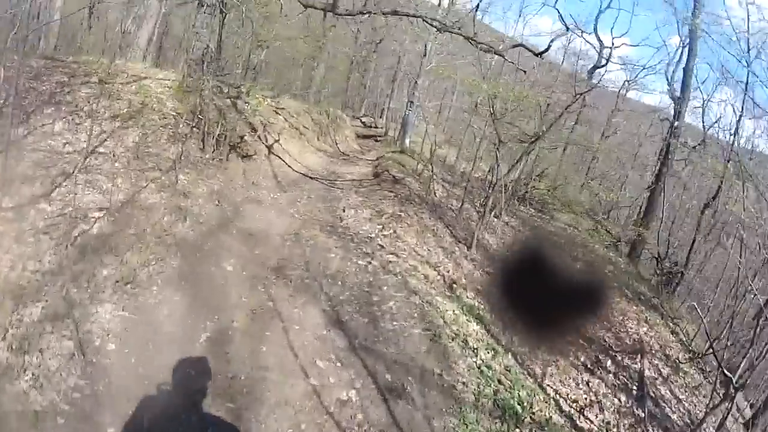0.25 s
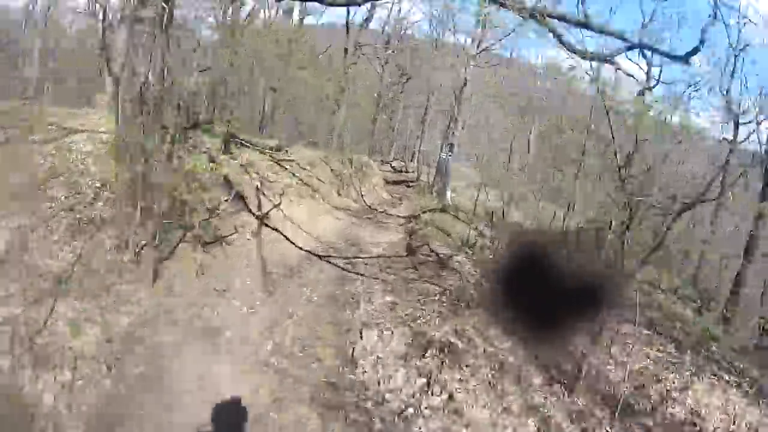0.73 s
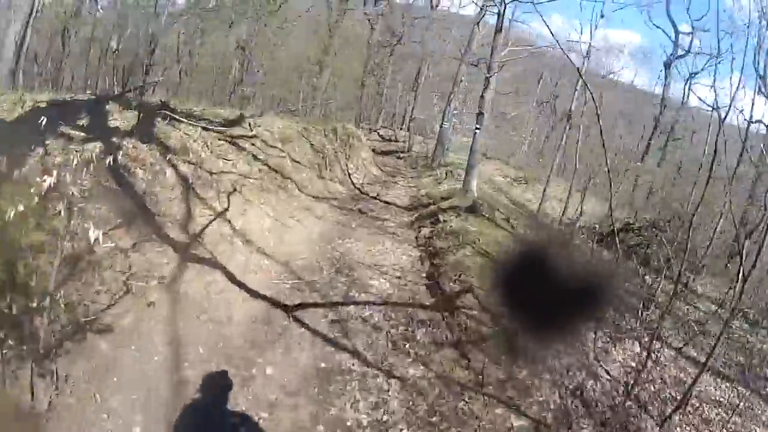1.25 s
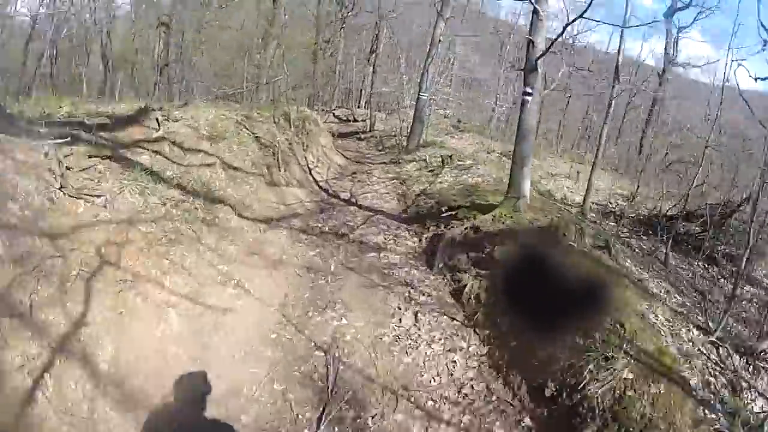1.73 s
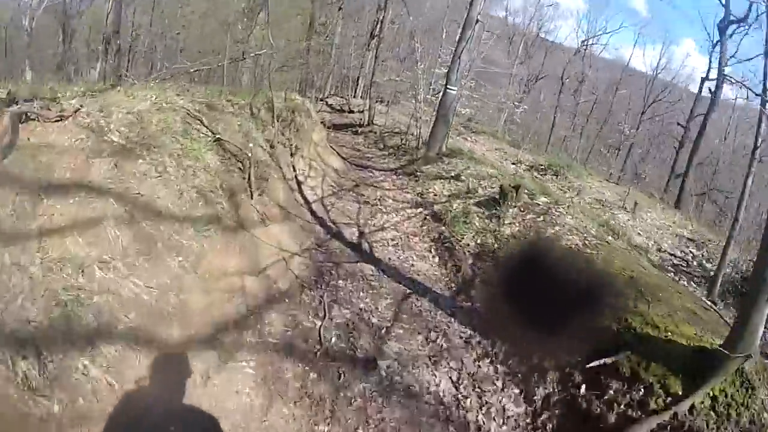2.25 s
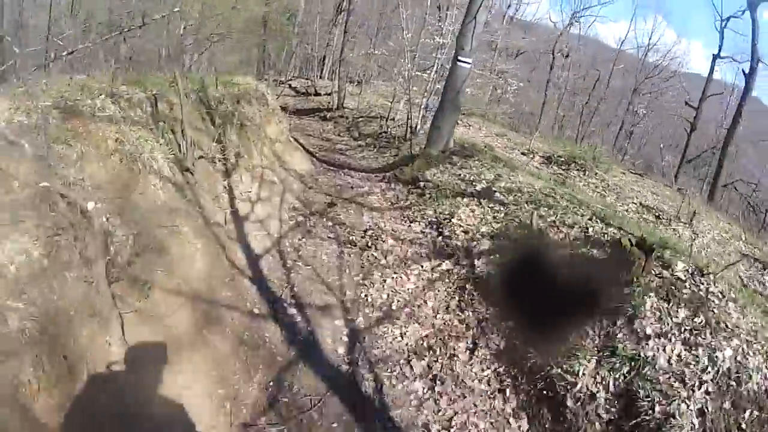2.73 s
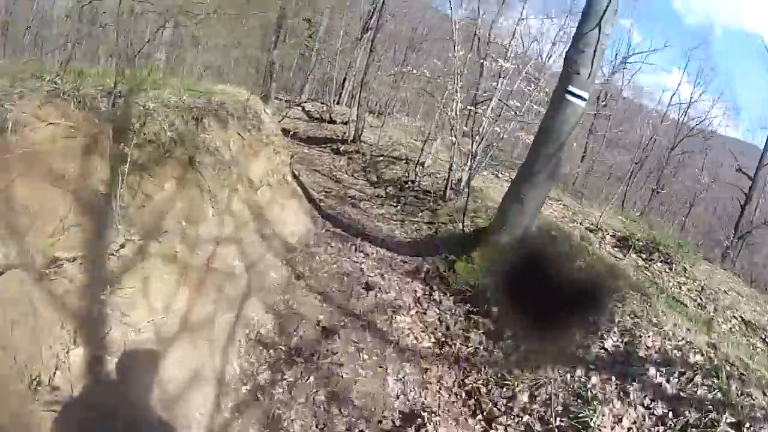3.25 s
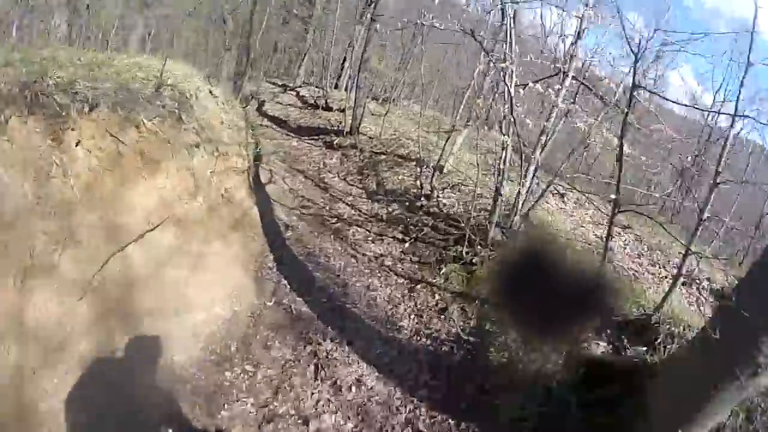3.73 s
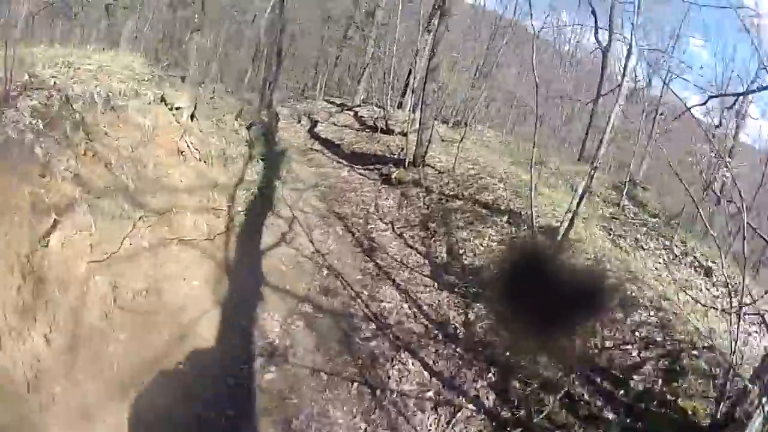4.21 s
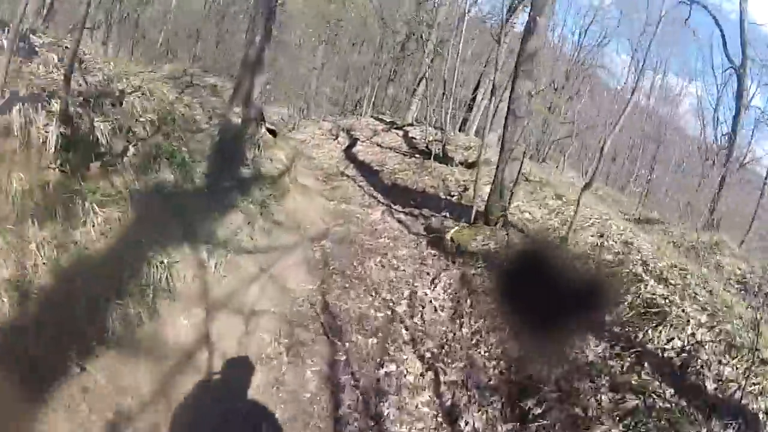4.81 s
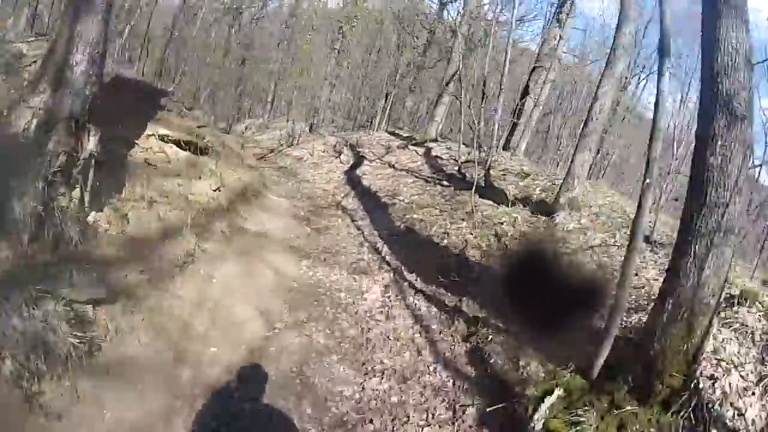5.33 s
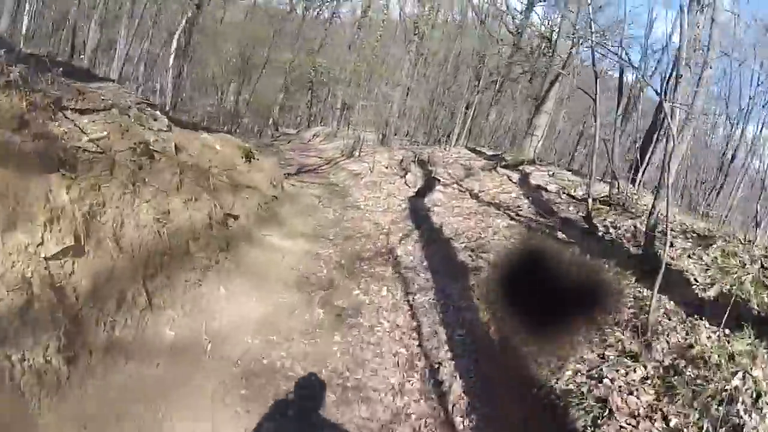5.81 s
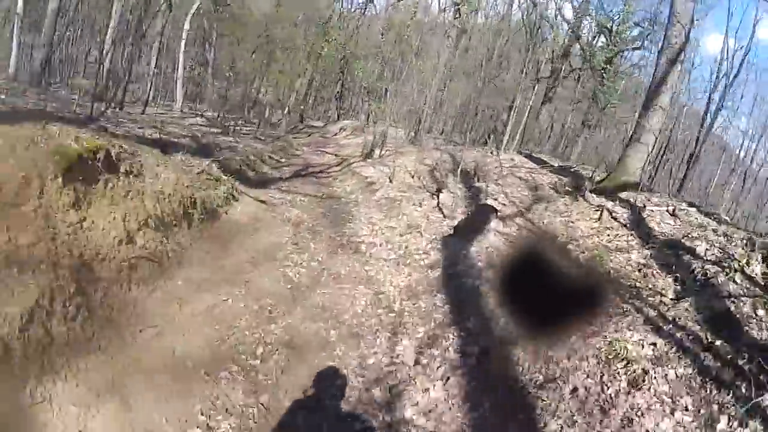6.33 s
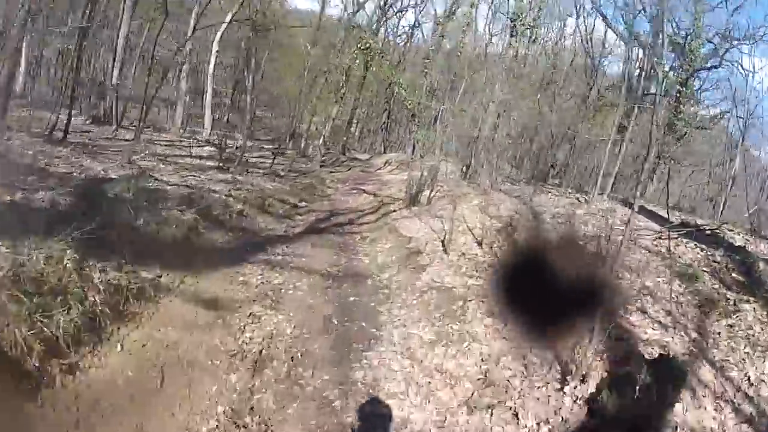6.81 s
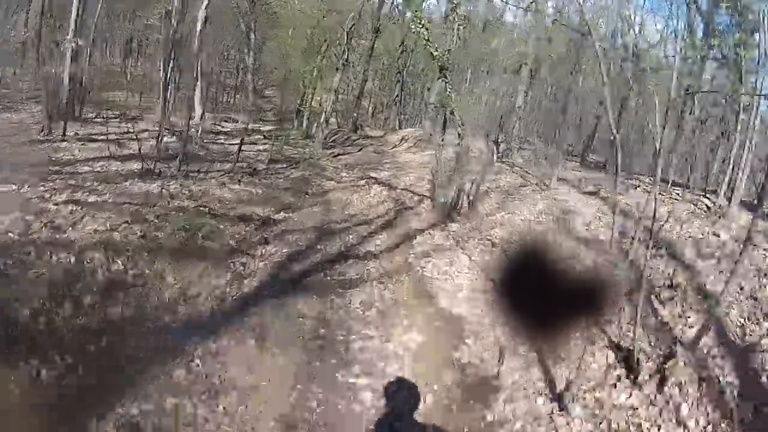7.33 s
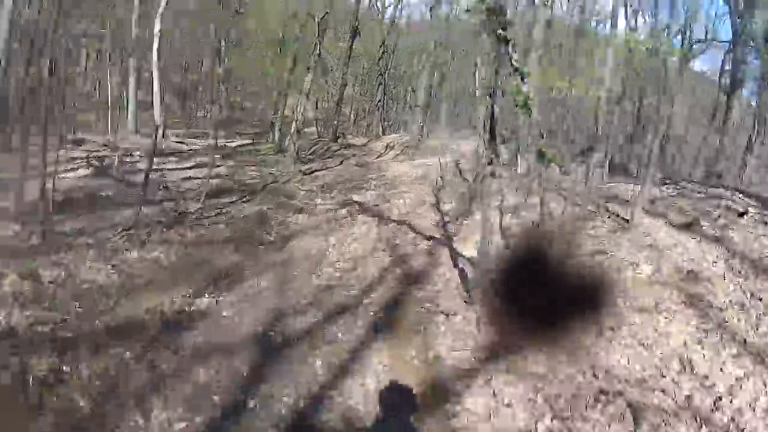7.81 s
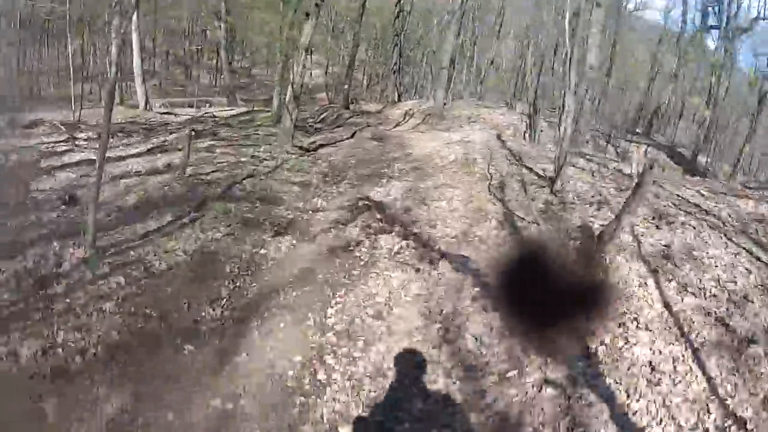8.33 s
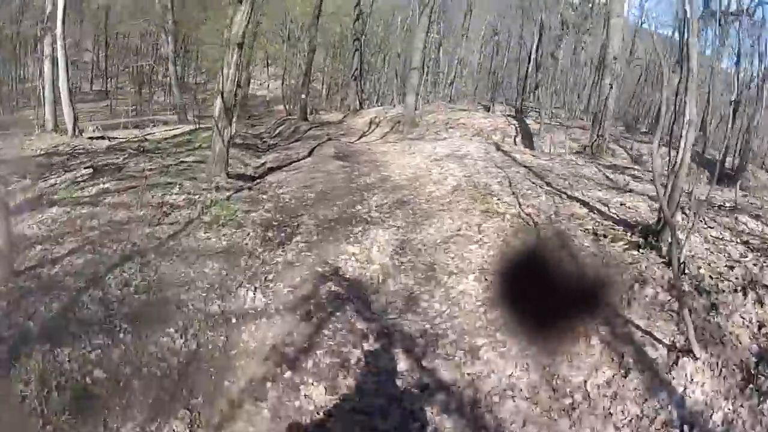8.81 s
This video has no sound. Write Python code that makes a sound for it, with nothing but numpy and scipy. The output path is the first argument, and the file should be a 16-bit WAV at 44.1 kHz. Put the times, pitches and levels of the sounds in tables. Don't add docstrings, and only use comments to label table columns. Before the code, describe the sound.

Heard from inside a plastic camera case on a cyclist's helmet: low wind buffeting, dull rumbling and faint tyre hiss on a dry woodland path, with leaf crackles and distant birds. After about three seconds, hard knocks, scrapes and low thuds from the loose mount dominate for four seconds, including a tiny squeak, then it settles back to quiet rolling.

```python
import sys
import numpy as np
from scipy import signal
from scipy.fft import rfft, irfft, next_fast_len
from scipy.io import wavfile
from scipy.ndimage import uniform_filter1d

SR = 44100
rng = np.random.default_rng(int(sys.argv[2]) if len(sys.argv) > 2 else 0)


def wav_out(sig):
    wavfile.write(sys.argv[1], SR, np.round(np.clip(np.atleast_2d(sig).T, -1, 1) * 32767).astype(np.int16))


def elevation(decibels):
    levels = np.asarray(decibels, float)
    return 10 ** (levels / 20)


N = 399546

# [start_s is the peak: peak_s, rise_over_breeze_db, half_length_s]
GUSTS = [(0.503, 7, 0.3), (.96, 6, 0.61), (1.417, 13.5, 0.24), (1.848, 10, 0.59), (2.2, 5.5, 0.41),
         (2.85, 2.5, 0.22), (3.298, 21, 0.069), (3.553, 8, 0.32), (3.943, 10, 0.73), (4.368, 23, 0.17),
         (4.6, 16.5, 0.18), (5.187, 15.5, 0.14), (5.662, 19.5, 0.17), (5.787, 15.5, 0.6),
         (6.302, 9.5, 0.86), (6.64, 2, .3), (7.162, 12.5, 0.29), (7.948, 7.5, 1), (8.86, 8, .4),
         (9.06, 11, 0.36)]
# [frequency_hz, density_db_per_hz]
WIND_COLOUR = [(9, -36), (16, -6), (30, -4.5), (41, -1), (54, -5), (68, -19), (100, -27), (150, -48)]
# [time_s, hiss_db, bumpiness_db]
GROUND = [(0.0, -58, -48), (0.28, -63, -51.5), (0.6, -59.5, -52), (0.96, -62, -48), (1.19, -57, -47.5),
          (1.5, -60, -50), (2.19, -57.5, -48.5), (2.85, -60.5, -51.5), (3.4, -55.5, -52.5),
          (3.76, -58.5, -43.5), (3.94, -63, -56.5), (4.52, -57, -42), (5.2, -61, -47), (6.0, -57.5, -47),
          (6.97, -57, -45.5), (7.3, -59, -50.5), (8.86, -60, -52.5), (9.06, -56.5, -53.5)]
# [frequency_hz, density_db_per_hz]
DRONE_COLOUR = [(60, -8), (110, 0.5), (200, -1), (320, -12), (375, -4), (450, -13), (650, -29)]
# [frequency_hz, density_db_per_hz]
HISS_COLOUR = [(450, -50), (600, -5), (1000, -8.5), (1160, -4), (1430, -12), (1820, -2), (2100, -12),
               (2470, -0.5), (2950, -14.5), (3300, -7.5), (3900, -8), (4050, -12.5), (5300, -11),
               (6000, -7.5)]
# [frequency_hz, level_db]
METAL_MODES = [(3116, 2.5), (3195, -4), (3391, 7), (3614, 3), (3668, 2.5), (3802, 4), (3966, -23),
               (4250, -6), (4545, -4), (4646, -1)]
# [start_s, level_db, length_s]
CHAIN_SLAPS = [
    (0.39, 6.5, 0.084),
    (2.185, -10, 0.084),
    (3.488, 3, 0.047),
    (4, 2.5, 0.097),
    (4.44, 1, 0.044),
    (6.291, 7, 0.04),
    (6.763, 1, 0.045),
    (6.842, 1, 0.17),
    (7.643, 2, 0.12),
    (8.55, -2, 0.08),
]
# [start_s, length_s, from_hz, to_hz, level_db]
BIRD_NOTES = [(0, 0.23, 3800, 3650, -64.5), (0.524, 0.34, 3740, 3830, -66), (1.003, 0.085, 3950, 3860, -62),
              (1.6, 0.049, 3680, 3680, -59.5), (1.737, .09, 3540, 3670, -63), (1.8, 0.09, 3660, 3520, -58),
              (1.875, 0.094, 3500, 3720, -58.5), (2.42, 0.063, 3720, 3560, -64),
              (2.487, .07, 3530, 3800, -61), (7.65, 0.07, 2400, 2520, -64), (7.69, 0.2, 2525, 2425, -60),
              (7.877, 0.11, 2760, 2620, -67), (.66, .06, 3680, 3800, -67), (.8, .06, 3830, 3900, -66),
              (0.953, .06, 3850, 3700, -67), (1.6, 0.056, 3840, 3960, -68), (2.659, 0.19, 4255, 4245, -69),
              (2.18, 0.11, 3830, 3800, -65), (7.95, .06, 3980, 3990, -69), (8.804, 0.23, 2450, 2440, -67)]
# [start_s, peak_db]
LEAF_CRACKS = [(0.2568, -46), (0.457, -46), (0.5127, -46.5), (1.1758, -38.5), (1.249, -42), (1.2614, -50),
               (1.321, -46), (1.345, -45), (1.681, -39.5), (1.7414, -45), (1.753, -47), (1.9487, -44.5),
               (2.199, -49), (3.285, -42.5), (3.5354, -43), (3.649, -42), (3.701, -47), (4.121, -43),
               (4.1767, -48), (4.339, -32), (4.346, -38), (4.354, -42), (4.333, -44), (5.635, -38),
               (5.657, -41.5), (6.4787, -39.5), (6.5966, -48.5), (6.8783, -44.5), (7.243, -49),
               (7.803, -50), (8.7054, -46.5)]
# [start_s, latch_db, shell_db, brow_db, lens_cover_db]
KNOCKS = [(0.44, -32, -35.5, -38, -31), (0.4549, -39, -45, -29, -46), (3.3542, -20, -27.5, -35, -17.5),
          (3.4135, -27.5, -35.5, -55, -52), (3.5339, -12.5, -20, -13.5, -23.5),
          (3.643, -20.5, -29.5, -34.5, -31), (3.7491, -12.5, -19, -18, -29.5), (3.8434, -22, -33, -29, -28),
          (3.8542, -19.5, -31, -29, -46), (4.12, -8.5, -20, -42, -23), (4.2566, -8, -21, -38, -21),
          (4.3146, -17.5, -28, -18.5, -31), (4.3287, -14.5, -33, -29, -21), (4.4903, -26, -29.5, -39, -24),
          (4.567, -17.5, -23, -26.5, -22.5), (4.6725, -23, -48, -30.5, -37), (4.8634, -15, -18, -41, -30.5),
          (5.1258, -21, -33, -27.5, -32.5), (5.698, -18, -42, -29.5, -27), (5.8374, -22, -34, -20.5, -34),
          (5.9035, -25.5, -30.5, -25, -29), (6.264, -19, -25.5, -24, -25.5), (6.379, -15, -19, -33, -27),
          (7.285, -11.5, -21, -31, -27.5)]
# [start_s, latch_db, shell_db, brow_db]
TAPS = [(0.2586, -44, -42, -37.5), (3.9316, -54, -44, -50), (2.816, -47, -74, -66), (3.552, -34, -35, -26),
        (3.605, -38, -42, -43), (3.7802, -33, -35.5, -46), (3.9036, -34, -35, -51),
        (4.1315, -20, -29, -33.5), (4.2665, -45, -27, -25.5), (4.4336, -27, -37, -31),
        (4.4503, -29, -40, -41), (4.733, -33, -42.5, -35), (4.9658, -36, -33, -35), (5.1735, -36, -44, -43),
        (5.243, -25.5, -37, -36.5), (5.3765, -36.5, -50, -32), (5.611, -33, -44, -31),
        (5.973, -35, -37, -42), (6.092, -27, -43, -34.5), (6.124, -53, -39, -37), (6.329, -22.5, -26, -51),
        (6.4948, -24.5, -31.5, -27.5), (6.5466, -28.5, -42, -32.5), (7.24, -50, -56, -46),
        (6.763, -33, -44, -60), (6.9729, -31, -33, -27), (7.0262, -21.5, -45, -21.5),
        (7.141, -38, -31.5, -42), (6.85, -42, -46, -57), (5.4571, -37, -44, -42), (4.560, -26, -42, -34),
        (3.877, -43, -37, -40), (6.619, -36, -28.5, -48), (7.080, -46, -32, -49), (3.273, -38.5, -57, -50),
        (4.579, -27, -38, -46), (6.59, -48, -42, -34)]
# [start_s, shell_hz, latch_hz]
SPOTS = [(0.259, 660, 1880), (0.441, 793, 1500), (0.4554, 706, 1790), (3.355, 1120, 1730),
         (3.4135, 1170, 1960), (3.534, 1154, 1760), (3.552, 990, 1880), (3.605, 1040, 1560),
         (3.643, 940, 1930), (3.749, 760, 1870), (3.78, 1080, 2170), (3.8434, 850, 1870),
         (3.8544, 1010, 1730), (3.9036, 1060, 1780), (4.121, 1174, 1750), (4.1315, 1070, 1750),
         (4.2564, 1120, 1750), (4.2666, 970, 1680), (4.315, 647, 1630), (4.329, 1300, 1970),
         (4.4335, 1040, 2420), (4.45, 1290, 1730), (4.491, 1280, 1880), (4.56, 1320, 1830),
         (4.567, 1240, 1810), (4.6725, 1000, 1830), (4.733, 736, 1560), (4.863, 838, 1850),
         (4.966, 594, 2080), (5.126, 940, 1824), (5.1735, 730, 1840), (5.243, 1150, 1700),
         (5.3765, 810, 1690), (5.611, 710, 1730), (5.698, 1080, 2010), (5.837, 705, 1765),
         (5.904, 980, 1685), (5.973, 720, 1850), (6.092, 600, 1810), (6.264, 1140, 1743),
         (6.329, 990, 1700), (6.379, 830, 1585), (6.495, 1100, 1790), (6.547, 710, 1700),
         (6.759, 730, 1920), (6.973, 1095, 2030), (7.026, 730, 1554), (7.141, 1010, 1880),
         (7.285, 895, 1840)]
# [frequency_hz, level_db, t60_s]
SHELL_MODES = [(720, 8.5, 0.037), (810, 2.5, 0.042), (958, 9.5, 0.019), (1123, 5.5, 0.026)]
# [frequency_hz, level_db, t60_s]
LATCH_MODES = [(1703, -3, 0.008), (1820, 3, 0.015), (1890, 4, 0.015), (2050, -8.5, 0.035),
               (2580, -11, 0.065)]
# [frequency_hz, level_db, t60_s]
RUBBED_LATCH_MODES = [(1560, -2.5, .012), (1760, 1, 0.015), (1930, 0, 0.014), (2114, -0.5, 0.017)]
# [frequency_hz, level_db, t60_s]
BROW_MODES = [(273, 2, 0.011), (364, 0, 0.048), (430.6, -4.5, 0.056), (560, -5, 0.016)]
# [frequency_hz, level_db, t60_s]
COVER_MODES = [(2750, 8, 0.0033), (3500, -1.5, 0.011), (3680, -7, 0.016)]
# [start_s, peak_db]
GRIT_TICKS = [
    (0.5128, -49),
    (8.3145, -40),
    (8.5965, -35),
    (8.408, -46),
    (8.706, -46),
    (9.045, -46),
]
# [frequency_hz, level_db, t60_s]
GRIT_MODES = [(2010, -9, 0.013), (2450, 6, 0.015), (3680, -16, 0.011)]
# [start_s, length_s, level_db, thud_over_it_db, clack_over_it_db]
SCRAPES = [(3.286, 0.38, -58.5, 6, 7.5), (3.46, 0.083, -60, 4, 6), (3.705, 0.037, -43.5, 10, 10.5),
           (3.738, 0.027, -40.5, 11, 8), (3.755, 0.051, -46, 15.5, -12), (3.86, 0.039, -38.5, 17.5, -3.5),
           (3.886, 0.046, -39, 12, -10), (4.125, 0.032, -53, 18, -4), (4.26, 0.04, -47, -1, -1),
           (4.227, 0.045, -61, 0, 2), (4.394, 0.089, -47, 12, -1), (4.446, 0.056, -52, 7, 6),
           (4.532, 0.044, -50, 1, -2), (4.566, 0.13, -50, 5, -2), (4.824, 0.078, -46, 11, -3),
           (5.032, 0.14, -51, 5, -2.5), (5.255, 0.095, -47, 7, -19), (5.383, 0.21, -58.5, 7, -7),
           (5.592, 0.062, -45.5, 4, -8), (5.7, 0.036, -44, 6, -12), (5.816, 0.11, -47, 7, 0),
           (5.929, 0.086, -55.5, 13, 0), (6.108, 0.059, -45.5, 6, -11), (6.246, 0.12, -64, 16, -0.5),
           (6.5, 0.038, -43, -3, -3), (6.555, .03, -49, 6, -9), (6.566, 0.066, -40.5, 0, -15),
           (6.601, 0.089, -36.5, 2.5, -13.5), (6.678, 0.053, -45.5, 2, -9), (6.746, 0.051, -45, 4, 7.5),
           (6.773, 0.053, -39.5, 7, 1), (6.813, 0.03, -48, 12, -16), (6.845, 0.042, -46, -3, -6),
           (6.929, 0.062, -42, 0, -3.5), (6.966, 0.055, -36, 5, -12), (7.008, 0.036, -39.5, 1, -4),
           (7.035, 0.049, -42, 4.5, -14), (7.067, 0.047, -37.5, 4, -15), (7.112, 0.056, -47, 2, -12)]
# [start_s, level_db, pitch_hz]
SWINGS = [(3.273, -33, 129), (3.5348, -10.5, 167.4), (3.5515, -19, 170), (3.605, -30, 148),
          (3.7502, -31, 178), (3.8556, -21, 164), (3.9036, -24, 165), (3.879, -28, 175), (4.664, -36, 183),
          (4.121, -12, 169.4), (4.1313, -16, 164), (4.2569, -12.5, 172), (4.2656, -21, 141),
          (4.3151, -23.5, 159), (4.3294, -26, 149), (4.4506, -31, 160), (4.579, -26.5, 163),
          (4.6742, -25.5, 189), (4.9665, -26, 156), (5.1264, -25.5, 178), (5.244, -32.5, 188),
          (5.6117, -36, 136), (5.699, -19, 217), (5.8379, -23, 167.4), (5.9045, -22.5, 170),
          (5.974, -32.5, 151), (6.2652, -21, 172), (6.328, -25.5, 183), (5.622, -25.5, 72.5),
          (6.9735, -35, 169), (7.1408, -31, 163), (7.285, -29.5, 168), (5.107, -33.5, 164),
          (5.173, -35, 170), (3.866, -26, 170), (3.778, -27.5, 165), (6.66, -35, 166), (7.052, -34, 170),
          (6.815, -37, 185), (6.826, -37, 181), (7.163, -33, 121), (6.79, -34.5, 200)]
# [start_s, peak_db]
EDGE_SNAPS = [(3.3557, -48), (3.5104, -46), (3.5363, -40), (3.7812, -47), (3.8456, -43), (4.122, -37),
              (4.1624, -47), (4.2362, -48), (4.316, -46), (4.5607, -49), (4.8633, -50), (5.599, -49),
              (6.3783, -50), (6.9021, -48), (7.2848, -50)]
# [start_s, length_s, from_hz, to_hz, level_db, octave_over_it_db]
SQUEALS = [
    (6.762, .03, 1000, 1040, -36, 4.5),
    (6.792, 0.025, 1100, 1075, -38, -3),
    (3.375, .04, 1100, 1050, -60, 4),
    (6.955, .03, 1050, 1080, -50, 3),
]
# [frequency_hz, density_db_per_hz]
TRACKS_APART = [(40, 8), (250, -0.5), (650, -5), (1200, -13), (3000, -12.5), (5300, -11)]

SCRAPE_RISE, SCRAPE_FALL = 0.22, 0.32


def level(x):
    return x / np.sqrt(np.mean(x ** 2))


def curves(table):
    s, *columns = np.transpose(table)
    return [np.interp(np.arange(N) / SR, s, c) for c in columns]


def walk(rate_hz):
    hold = int(SR / rate_hz)
    steps = np.repeat(rng.standard_normal(N // hold + 1), hold)
    return 1.68 * uniform_filter1d(uniform_filter1d(steps, hold), hold)[:N]


def coloured(spectrum, grain_db, own_db, rate_hz, count):
    hz, db = np.transpose(spectrum)
    size = next_fast_len(N)
    log_hz = np.log(np.fft.rfftfreq(size, 1 / SR) + 1)
    grains = rng.standard_normal(N) * elevation(grain_db * walk(150))
    whole = rfft(grains, size) * elevation(np.interp(log_hz, np.log(hz), db, -120, -120))
    centres = np.linspace(np.log(hz[0]), np.log(hz[-1]), count)
    out = np.zeros(N)
    for centre in centres:
        share = np.clip(1 - np.abs(log_hz - centre) / (centres[1] - centres[0]), 0, 1)
        out += irfft(whole * share, size)[:N] * elevation(own_db * walk(rate_hz))
    return level(out)


def ring(x, hz, t60):
    turn, keep = 2 * np.pi * hz / SR, np.exp(-np.log(1000) / (t60 * SR))
    return signal.lfilter([0, keep * np.sin(turn)], [1, -2 * keep * np.cos(turn), keep ** 2], x)


def strikes(at_s, size):
    at = np.clip((at_s * SR).astype(int), 0, N - 1)
    return np.bincount(at.ravel(), size.ravel(), N)


def swell(start, length, rise, fall):
    at = np.arange(int(max(start, 0) * SR), int((start + length) * SR))
    gone = (at / SR - start) / length
    return at, np.clip(np.minimum(gone / rise, (1 - gone) / fall), 0, 1), gone


def slips(rate_hz, spread_db):
    contacts = (rng.random(N) < rate_hz / SR) * rng.standard_normal(N)
    return level(contacts * elevation(spread_db * rng.standard_exponential(N)))


def gusts():
    t = np.arange(N) / SR
    return np.max([db * np.clip(1 - np.abs(t - s) / half, 0, 1) for s, db, half in GUSTS], axis=0)


def wind(gust_db):
    return elevation(-47 + gust_db) * coloured(WIND_COLOUR, grain_db=0.5, own_db=1.36, rate_hz=4.4, count=3)


def drone(bump_db, gust_db):
    loudness = elevation(bump_db + 0.1 * gust_db + 0.2)
    return loudness * coloured(DRONE_COLOUR, grain_db=1.0, own_db=0.0, rate_hz=14, count=5)


def tyre_hiss(hiss_db):
    return elevation(hiss_db + 3.5) * coloured(HISS_COLOUR, grain_db=1.0, own_db=1.4, rate_hz=20, count=10)


def metal():
    t = np.arange(N) / SR
    slap = sum(elevation(db) * (t > s) * (t < s + length) for s, db, length in CHAIN_SLAPS)
    sing = np.zeros(N)
    for hz, db in METAL_MODES:
        push = rng.standard_normal(N) * (elevation(0.78 * walk(5.4)) + slap)
        sing += elevation(db) * ring(push, hz, 0.23)
    jingle = slap * ring(slips(1400, 1.6), 3690.0, 0.013)
    return elevation(-104.0) * sing + elevation(-75.0) * jingle


def birds():
    out, waver, flutter = np.zeros(N), walk(45), elevation(1.5 * walk(70))
    for s, length, from_hz, to_hz, db in BIRD_NOTES:
        at, fade, gone = swell(s, length, rise=0.17, fall=0.17)
        glide = from_hz + (to_hz - from_hz) * (1 - np.cos(np.pi * gone)) / 2
        turn = 2 * np.pi * np.cumsum(glide * (1 + 0.0025 * waver[at])) / SR
        out[at] += np.sqrt(2) * elevation(db) * fade * flutter[at] * np.sin(turn + 0.19 * np.sin(turn / 12))
    t = np.arange(8000) / SR
    echoes = rng.standard_normal(len(t)) * np.exp(-np.log(1000) * t / 0.23)
    echoes /= np.linalg.norm(echoes)
    return elevation(-1.0) * out + elevation(-11.0) * signal.fftconvolve(out, echoes)[:N]


def leaves():
    s, db = np.transpose(LEAF_CRACKS)
    grains = rng.standard_normal((len(s), 24, 2))
    at_s = s[:, None] + 0.0049 * np.abs(grains[..., 0])
    cracks = strikes(at_s, elevation(db - 3.5)[:, None] * grains[..., 1])
    return ring(cracks, 4830.0, 0.0036) + elevation(-5.5) * ring(cracks, 3760.0, 0.0019)


def struck(modes, at_s, db, chatter, scatter_db, lead_hz=None, lead_db=0, lead_s=.001, snap_db=-60,
           rubbed=None):
    t = np.arange(2000) / SR
    rub = uniform_filter1d(slips(3500, 1.3), size=8)
    rubbing = np.zeros(N)
    for k, (hz, gain_db, t60) in enumerate(rubbed or modes):
        rubbing += (-1) ** k * elevation(gain_db) * ring(rub, hz, 0.47 * t60)
    out = level(rubbing) * chatter
    for s, peak_db in zip(at_s, db):
        chance = rng.standard_normal((len(modes) + 1, 2))
        late = np.maximum(t - .007 - 0.00063 * chance[-1, 0], 0)
        bounce = elevation(-19.5 + 3.7 * chance[-1, 1]) * late / 0.0023 * np.exp(-late / 0.0023)
        flurry = (t / 0.0015) ** 2 * np.exp(-t / 0.0011) + bounce
        push = uniform_filter1d(rng.standard_normal(len(t)), size=8) * flurry
        y = np.zeros(len(t))
        for (hz, gain_db, t60), (louder, sharper) in zip(modes, chance):
            y += elevation(gain_db + scatter_db * louder) * ring(push, hz * (1 + 0.03 * sharper), t60)
        y = y / np.abs(y).max() + elevation(snap_db) * push / np.abs(push).max()
        if lead_hz is not None:
            hz = np.interp(s, np.array(SPOTS)[:, 0], lead_hz)
            clarity = elevation(lead_db + 0.18 * (peak_db + 18.0))
            y = y + clarity * (t / lead_s) ** 2 * np.exp(-t / lead_s) * np.sin(2 * np.pi * hz * t)
        spot = out[int(s * SR):][:len(t)]
        spot += (elevation(peak_db) * y)[:len(spot)]
    return out


def loose_mount(shake, high):
    taps = [(*tap, tap[1] - 26) for tap in TAPS]
    s, latch_db, shell_db, brow_db, cover_db = np.transpose([*KNOCKS, *taps])
    _, shell_hz, latch_hz = np.transpose(SPOTS)
    shell = struck(SHELL_MODES, s, shell_db + 0.5, shake, scatter_db=3.0,
                   lead_hz=shell_hz, lead_db=6.0, lead_s=0.0015)
    latch = struck(LATCH_MODES, s, latch_db - 3.0, high, scatter_db=5.5, lead_hz=latch_hz, lead_db=6.5,
                   lead_s=0.0011, snap_db=-6.0, rubbed=RUBBED_LATCH_MODES)
    brow = struck(BROW_MODES, s, brow_db + 5.5, shake * elevation(-4.0), scatter_db=4.5)
    cover = struck(COVER_MODES, s + 0.000672, cover_db, high * elevation(-22.0), scatter_db=-2.5, snap_db=-7.5)
    body = shell + latch + brow
    wall = signal.ellip(4, 1, 30, 2280, fs=SR, output="sos")
    return signal.sosfilt(wall, body) + elevation(-14) * body + cover


def grit(high):
    s, db = np.transpose(GRIT_TICKS)
    return struck(GRIT_MODES, s, db, high * elevation(-13.5), scatter_db=-3.0)


def shaking():
    t = np.arange(N) / SR
    rattle_db = -68 + np.array([0, 16.5, 2])
    out = np.outer(elevation(rattle_db), (t > 3.22) * (t < 7.3))
    for s, length, db, thud_db, clack_db in SCRAPES:
        at, shape, gone = swell(s, length, SCRAPE_RISE, SCRAPE_FALL)
        weakening = elevation(-4 * (gone - 0.46))
        out[:, at] += np.outer(elevation(db + np.array([0, thud_db, clack_db])), shape ** 2 * weakening)
    return out * elevation(1.88 * walk(90))


def padding_sway(low):
    push = uniform_filter1d(slips(400, 1.0), size=60)
    return level(ring(push, 180.0, 0.058)) * low


def helmet_swings():
    out, t = np.zeros(N + 6000), np.arange(6000) / SR
    shape = (1 - np.exp(-t / 0.0016)) ** 2 * np.exp(-np.log(1000) * t / 0.046)
    for s, db, hz in SWINGS:
        turns = 0.18 + hz * (0.897 * t + 0.0015 * (1 - np.exp(-t / 0.034)))
        out[int(s * SR):][:len(t)] += elevation(db) * np.sin(2 * np.pi * turns) * shape
    return elevation(15.0) * out[:N]


def snaps():
    s, db = np.transpose(EDGE_SNAPS)
    grains = rng.standard_normal((len(s), 5, 2))
    at_s = s[:, None] + 0.0008 * np.abs(grains[..., 0])
    clicks = strikes(at_s, elevation(db)[:, None] * np.sign(grains[..., 1]))
    return ring(clicks, 4800.0, 0.0013) + elevation(4.0) * ring(clicks, 6000.0, 0.003)


def squeals():
    out, wobble, rough = np.zeros(N), walk(350), elevation(3.4 * walk(249))
    for s, length, from_hz, to_hz, db, octave_db in SQUEALS:
        at, fade, gone = swell(s, length, SCRAPE_RISE, SCRAPE_FALL)
        hz = (from_hz + (to_hz - from_hz) * gone) * (1 + 0.04 * wobble[at])
        turn = 2 * np.pi * np.cumsum(hz) / SR
        out[at] += elevation(db) * fade * rough[at] * (np.sin(turn) + elevation(octave_db) * np.sin(2 * turn))
    return out


def scene():
    gust_db = gusts()
    hiss_db, bump_db = curves(GROUND)
    shake, low, high = shaking()
    air_and_ground = wind(gust_db) + drone(bump_db, gust_db) + tyre_hiss(hiss_db)
    trail = metal() + birds() + leaves()
    helmet = loose_mount(shake, high) + grit(high) + padding_sway(low) + helmet_swings()
    heard = air_and_ground + trail + helmet + snaps() + squeals()
    apart = elevation(-84) * coloured(TRACKS_APART, grain_db=2.0, own_db=4.5, rate_hz=20, count=2)
    return heard + np.outer([1, -1], apart)


def low_pass(x):
    return signal.sosfilt(signal.butter(12, 16310, fs=SR, output="sos"), x)


def record(dry):
    guard = signal.butter(14, 5620, fs=SR, output="sos")
    guarded = signal.sosfilt(guard, np.clip(dry, -.9, .9))
    held = np.repeat(signal.resample_poly(guarded, 40, 147, axis=1), 4, axis=1)
    top_cut = signal.ellip(10, .2, 60, 15200, fs=48000, output="sos")
    mix = signal.resample_poly(signal.sosfilt(top_cut, held), 147, 160, axis=1)[:, :N]
    return low_pass(mix)


dry = scene()
out = record(dry)
wav_out(out)
```